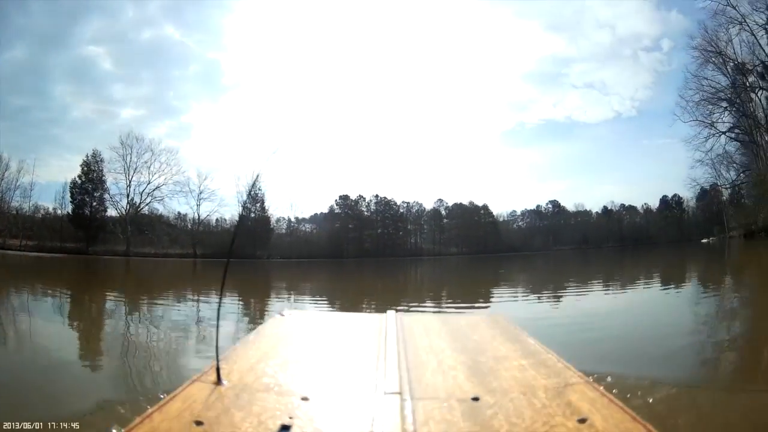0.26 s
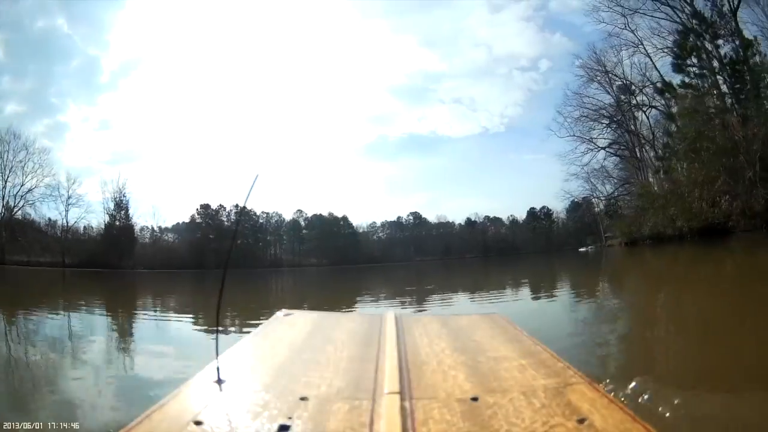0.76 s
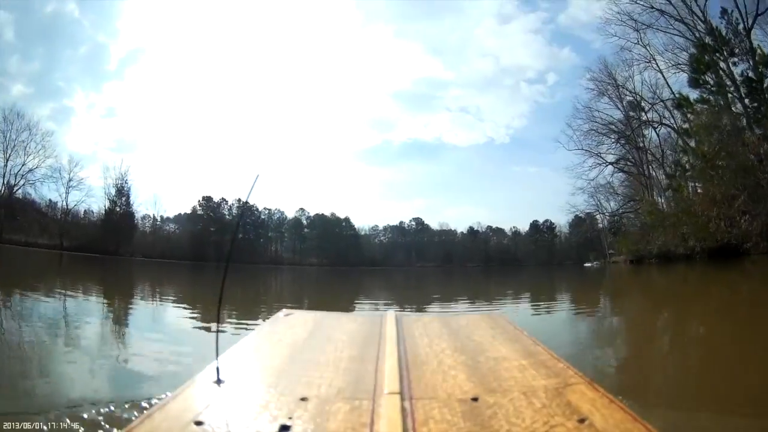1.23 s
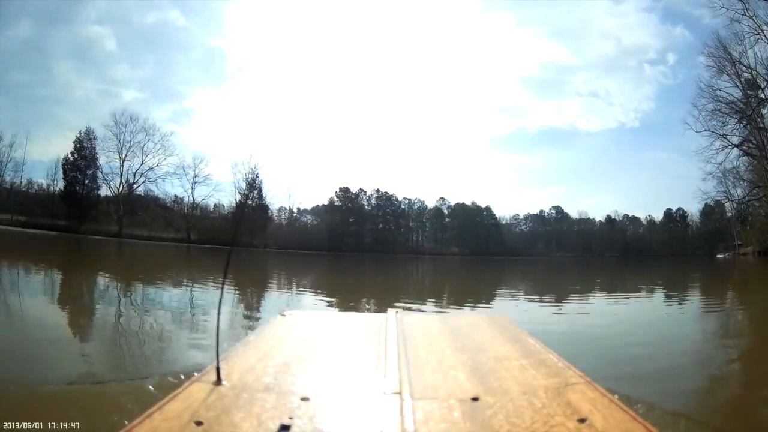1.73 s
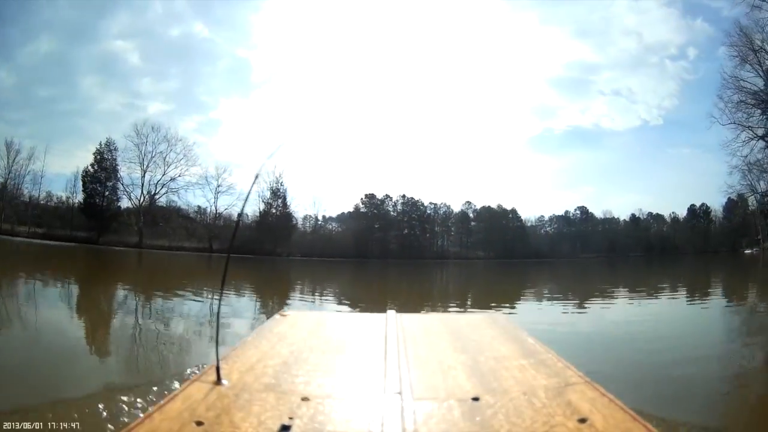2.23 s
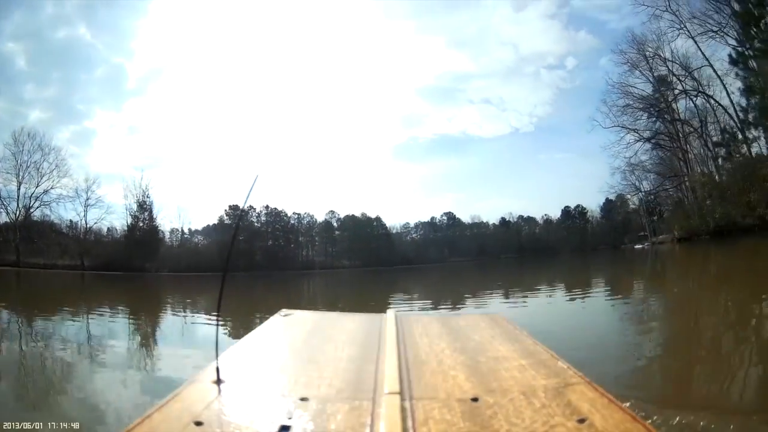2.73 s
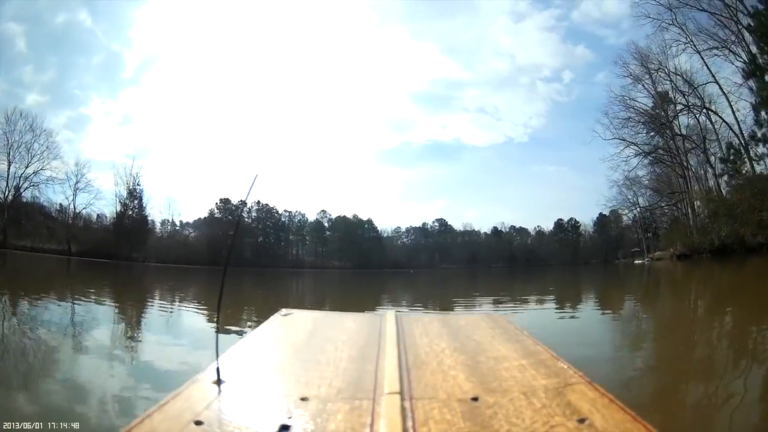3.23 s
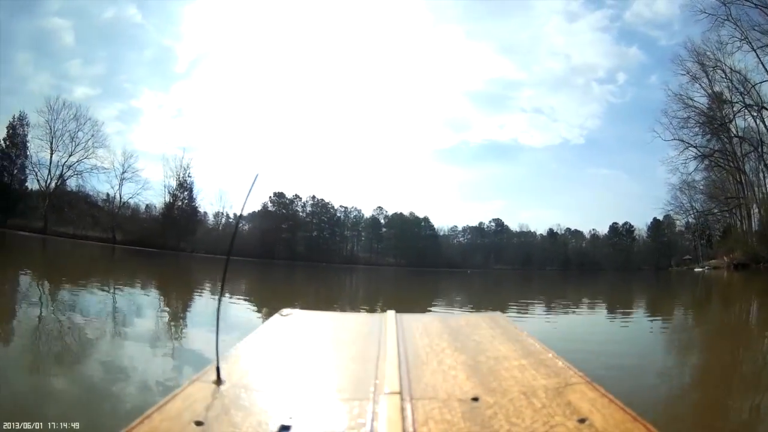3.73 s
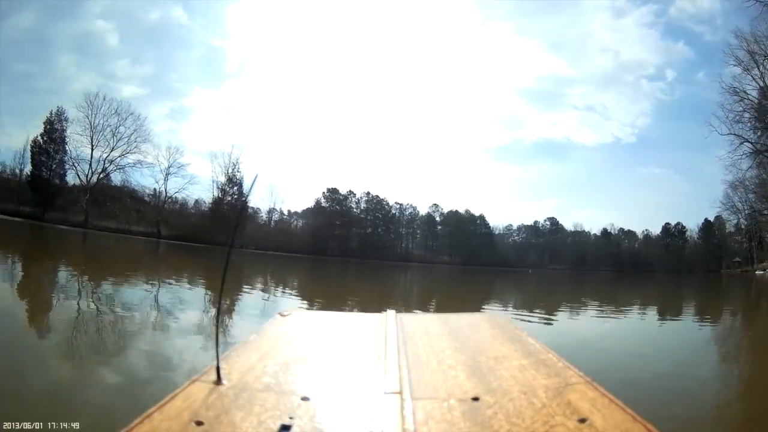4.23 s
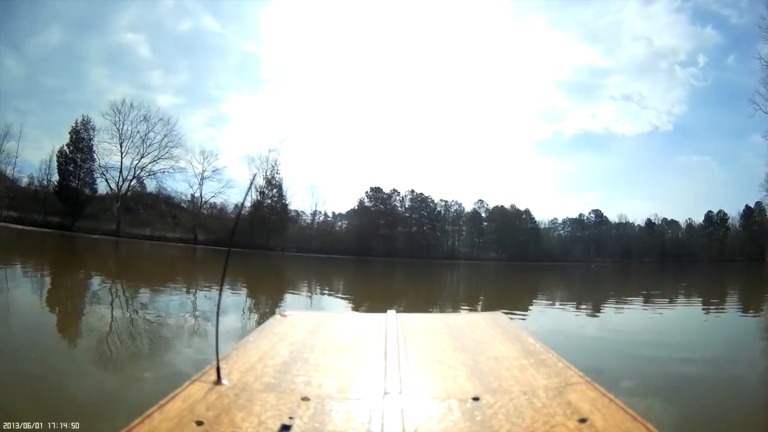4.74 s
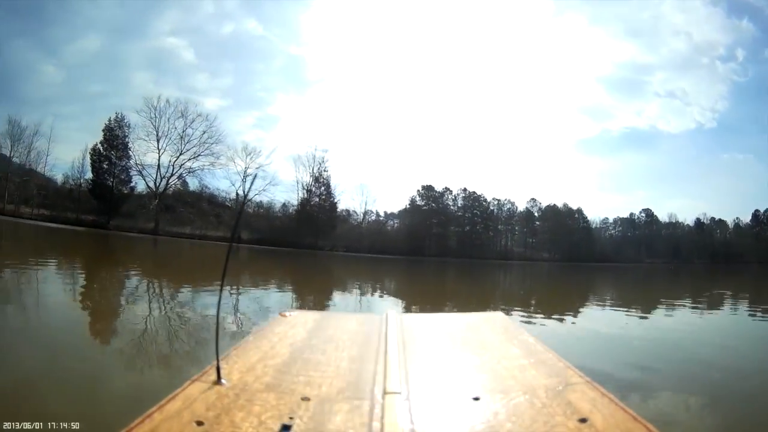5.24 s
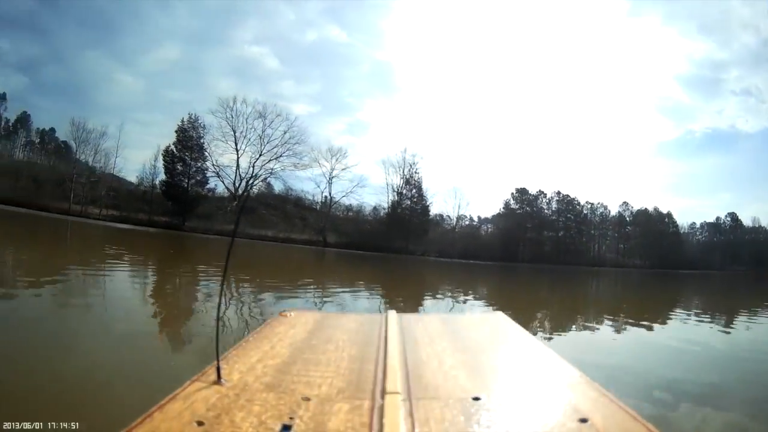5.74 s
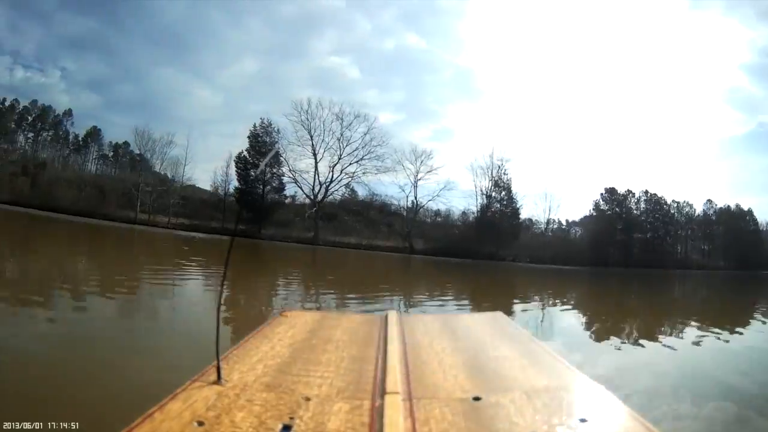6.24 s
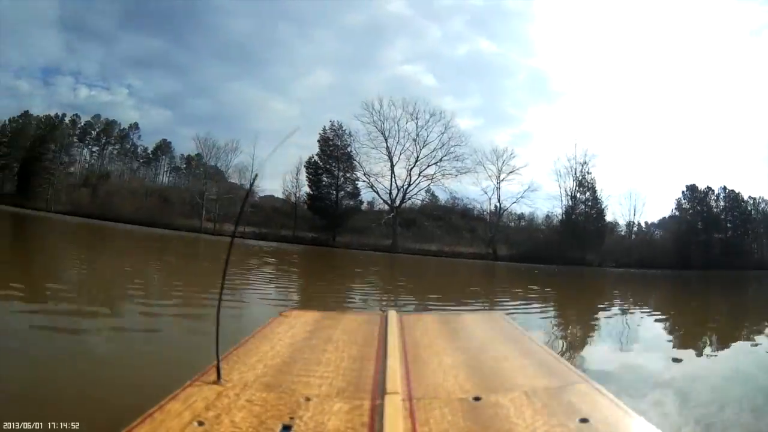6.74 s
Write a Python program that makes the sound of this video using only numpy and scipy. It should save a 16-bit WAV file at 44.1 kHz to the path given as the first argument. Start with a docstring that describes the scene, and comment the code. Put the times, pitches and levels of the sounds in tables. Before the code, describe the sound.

A small electric motor and propeller whine close up on a model boat, surging, dropping out briefly, then climbing in steps to a steady shrill buzz.

```python
"""A model airboat crosses a calm lake, heard from its own deck: blade hum, magnet whine, commutation whistle
and chopper tone of a 14-pole brushless motor with a two-blade propeller, all locked to one shaft speed but the chopper.
The speed climbs for 0.7 s, then the throttle is shut; from 0.85 s the propeller freewheels, electrically silent.
Near 1.1 s the controller restarts softly; the speed steps up until about 4 s and finally eases a little.
Throughout, the tones overload the microphone, which breeds a web of sum and difference tones."""
import sys
import numpy as np
from scipy import signal
from scipy.fft import rfft, irfft, next_fast_len
from scipy.io import wavfile

SR = 44100
rng = np.random.default_rng(int(sys.argv[2]) if len(sys.argv) > 2 else 0)


def to_wav(sig):
    """Store sig (one row per channel, or 1-D mono) as 16-bit WAV at the path in sys.argv[1].

    Samples outside -1..1 are clipped; the rate is SR.
    """
    pcm = np.clip(np.atleast_2d(sig), -1, 1) * 32767
    pcm = np.round(pcm).astype(np.int16)
    wavfile.write(sys.argv[1], SR, pcm.T)  # frames by channels


N = 308259
TIME_S = np.arange(N) / SR

# Stick moves. Each row: start in seconds, shaft speed then headed for in turns per s (Hz).
THROTTLE_MOVES = [(0, 88.61), (0.078, 97.59), (0.331, 108.44), (0.516, 113.24), (0.729, 94.42),
                  (0.813, 58.01), (0.971, 47.45), (1.094, 80.09), (1.321, 86.01), (1.408, 105.72),
                  (1.84, 107.78), (2.43, 112.73), (3.583, 122.32), (3.863, 125.03), (4.056, 134.84),
                  (4.088, 136.37), (5.628, 135.72), (6.393, 133.66)]
# Drive current, cut while the propeller freewheels. Each row: time in seconds, gain of electric sounds (0 to 1).
DRIVE_CURRENT = [(0, 1), (.81, 1), (.846, .55), (.852, 0), (1.086, 0), (1.094, .45), (1.15, 1), (7, 1)]
# Propeller overtones. Each row: multiple of shaft speed.
PROPELLER_ORDERS = [1, 2, 3, 4, 5, 6]
# Their levels. Each row: level in dB re BLADE_DB.
PROPELLER_LEVELS_DB = [-25, 0.5, -22, -13, -29, -24]
# Off-centre rotor's sidebands of the whine. Each row: orders above the whine in multiples of shaft speed, sign.
WOBBLE_ORDERS = [(-2, 1), (-1, 1), (1, -1), (2, 1)]
# Their levels. Each row: level in dB re the whine, extra dB at full whirl.
WOBBLE_LEVELS_DB = [(-23, 9.5), (-2.5, 0), (-34, 28), (-21.5, 13.5)]
# Cogging, present even without current. Each row: multiple of shaft speed.
COGGING_ORDERS = [8, 10, 11, 12, 25, 28, 37, 56, 84]
# Their levels. Each row: level in dB before the hull response.
COGGING_LEVELS_DB = [-66.5, -78.5, -57, -61.5, -71, -59, -60, -59, -54]
# Weaker winding forces. Each row: multiple of chopper frequency, multiple of shaft speed.
FORCE_ORDERS = [(0, 21), (0, 56), (0, 63), (0, 70), (0, 84), (0, 105), (1, 21), (1, 42), (1, -28), (1, -42),
                (1, -63), (1, -126), (2, -63), (2, -105)]
# Their levels. Each row: level in dB at cruise, before the bell response.
FORCE_LEVELS_DB = [-65, -63, -52.5, -61, -43.5, -52, -52, -47, -53, -43.5, -64, -47, -56, -51.5]
# Motor bell response. Each row: frequency in Hz, gain in dB.
BELL_RESPONSE = [(300, -46), (2000, -15.5), (3800, -24), (4600, -9.5), (5200, -1.5), (5800, -11.5),
                 (6600, -18), (8000, -15), (10800, -32.5), (12200, -18), (14000, -19)]
# Pylon and hull response. Each row: frequency in Hz, gain in dB.
HULL_RESPONSE = [(100, -6), (350, -0.5), (650, -17.5), (880, -9), (1035, 3.5), (1200, -9), (1600, -3.5),
                 (1900, 0), (2250, -8), (2700, -9.5), (3500, -27), (5200, -22), (7000, -30), (14000, -44)]
# Spectrum shape of winding-switching hash. Each row: frequency in Hz, relative density in dB.
HASH_SHAPE = [(200, -28), (1500, 11), (3500, 1), (4400, 1), (5200, 12.5), (5900, -3.5), (6700, 2.5),
              (9000, 4), (14000, -3.5)]
# Spectrum shape of water and air along the hull. Each row: frequency in Hz, relative density in dB.
WASH_SHAPE = [(20, 1.5), (50, -2.5), (110, -3.5), (250, -11.5), (600, -16), (1500, -18), (5000, -18),
              (14000, -45)]

INERTIA_S, CRUISE_HZ = .069, 115  # shaft speeds in Hz are turns per s
# Levels at cruise, and the powers of pace with which they grow; whine and commutation precede hull and bell.
BLADE_DB, BLADE_POWER = -44, 1.7
MAGNET_DB, MAGNET_POWER = -44.5, 3.06
COMMUTATION_DB, COMMUTATION_POWER = -31.5, 3.62
# Speeding up draws more current, slowing down less: extra current in dB at this acceleration.
SURGE_DB, SURGE_HZ_PER_S = -39, 100
# The chopper sags as the shaft speeds up; its lower sideband peaks at middle duty.
CHOPPER_HZ, CHOPPER_SAG_HZ_PER_HZ, CHOPPER_DB = 7805, .89, -44
SIDEBAND_DB, MID_DUTY_HZ, DUTY_WIDTH_HZ = -37.5, 107, 39
# Rotor whirl near full throttle; pylon sway from propeller imbalance.
WHIRL_HZ, WHIRL_WIDTH_HZ = 134, 7.7
SWAY_HZ, SWAY_WIDTH_HZ, SWAY_DB = 108, 4.9, -65
RATTLE_DB, BEARING_HISS_DB, BUZZ_DB, HASH_DB, WASH_DB = -57, -66.5, -55, -53, -58.5
OVERLOAD_DB, CUTOFF_HZ = -36, 14200


def from_db(db):
    """Amplitude factor of a dB value."""
    return 10 ** (np.asarray(db) / 20)


def gain_at(response, hz):
    """Gain of a response at any frequency, joined by straight lines in dB over log frequency."""
    points_hz, points_db = np.transpose(response)
    return from_db(np.interp(np.log(np.abs(hz) + 1), np.log(points_hz), points_db))


def coloured(x, response):
    """x through a response; rms about the mean is 1."""
    size = next_fast_len(N)
    spectrum = rfft(x, size) * gain_at(response, np.fft.rfftfreq(size, 1 / SR))
    y = irfft(spectrum, size)[:N]
    return y / y.std()


def drift(rate_hz):
    """Slow chance with spread 1: two-pole low-passed noise, computed every 40 samples."""
    r = np.exp(-80 * np.pi * rate_hz / SR)
    noise = rng.standard_normal(N // 40 + 2002)
    slow = signal.lfilter([1], [1, -2 * r, r * r], noise)[2000:]  # drop the settling
    return np.interp(np.arange(N) / 40, np.arange(len(slow)), slow / slow.std())


def tone(angle_rad, level_db):
    """A sinusoid of the given rms level."""
    return np.sqrt(2) * from_db(level_db) * np.cos(angle_rad)


def every_turn(angle_rad, count=110, size=4096):
    """A random roughness of equal overtones that repeats with each turn of the shaft."""
    overtones = np.exp(2j * np.pi * rng.random(count))
    pattern = irfft(np.r_[0, overtones], size)
    return np.interp(angle_rad, np.arange(size) * 2 * np.pi / size, pattern, period=2 * np.pi)


def near(speed_hz, centre_hz, width_hz):
    """1 at a resonant speed, falling to both sides."""
    return 1 / (1 + ((speed_hz - centre_hz) / width_hz) ** 2)


def shaft_speed():
    """After each stick move the motor eases towards its new speed, without overshoot."""
    speed_hz = np.full(N, float(THROTTLE_MOVES[0][1]))
    for (_, before_hz), (start_s, after_hz) in zip(THROTTLE_MOVES, THROTTLE_MOVES[1:]):
        age = np.maximum(TIME_S - start_s, 0) / INERTIA_S
        speed_hz += (after_hz - before_hz) * (1 - (1 + age) * np.exp(-age))
    return speed_hz


def propeller(angle_rad, speed_hz, pace, flutter_db=0.32):
    """Two blades pass each turn, louder with speed; slight imbalance adds odd multiples and sways the pylon."""
    hum = sum(tone(k * angle_rad, BLADE_DB + db) for k, db in zip(PROPELLER_ORDERS, PROPELLER_LEVELS_DB))
    sway = tone(angle_rad, SWAY_DB) * near(speed_hz, SWAY_HZ, SWAY_WIDTH_HZ)
    return (hum * pace ** BLADE_POWER + sway) * from_db(flutter_db * drift(9))


def magnets(angle_rad, speed_hz, pace, flutter_db=1.18, poles=14):
    """Fourteen poles tug at the stator; whine, wobble and cogging flare up in the hull's resonances."""
    def through_hull(k, db):
        """One multiple of the shaft speed, fluttering, shaped by the hull."""
        force = tone(k * angle_rad, db + flutter_db * drift(10.5))
        return force * gain_at(HULL_RESPONSE, k * speed_hz)

    whirl = near(speed_hz, WHIRL_HZ, WHIRL_WIDTH_HZ)
    whine = through_hull(poles, MAGNET_DB)
    wobble = 0
    for (k, sign), (db, whirl_db) in zip(WOBBLE_ORDERS, WOBBLE_LEVELS_DB):
        wobble += sign * through_hull(poles + k, MAGNET_DB + db + whirl_db * whirl)
    cogging = sum(through_hull(k, db) for k, db in zip(COGGING_ORDERS, COGGING_LEVELS_DB))
    return (whine + wobble) * pace ** MAGNET_POWER + cogging


def windings(angle_rad, speed_hz, pace, surge, flutter_db=3.0, waver_db=0.55):
    """Current steps 42 times a turn and is chopped at a rate that sags with speed; the two mix and ring the bell."""
    chopper_hz = CHOPPER_HZ - CHOPPER_SAG_HZ_PER_HZ * speed_hz
    chop_rad = 2 * np.pi * np.cumsum(chopper_hz) / SR

    def through_bell(m, k, db):
        """One mix of chopper and shaft multiples, shaped by the bell."""
        force = tone(m * chop_rad + k * angle_rad, db)
        return force * gain_at(BELL_RESPONSE, m * chopper_hz + k * speed_hz)

    steady_current = from_db(COMMUTATION_DB) * pace ** COMMUTATION_POWER
    current = np.maximum(steady_current + from_db(SURGE_DB) * surge, 0)
    commutation = current * through_bell(0, 42, waver_db * drift(6))
    duty = np.exp(-((speed_hz - MID_DUTY_HZ) / DUTY_WIDTH_HZ) ** 2)
    sideband = duty * through_bell(1, -21, SIDEBAND_DB + waver_db * drift(6))
    ripple = pace ** -.5  # current is most jagged at low throttle
    weaker = sum(through_bell(m, k, db + flutter_db * drift(8.1))
                 for (m, k), db in zip(FORCE_ORDERS, FORCE_LEVELS_DB))
    return tone(chop_rad, CHOPPER_DB) + commutation + sideband + ripple * weaker


def switching_noise(angle_rad, pace):
    """Uneven switching buzzes and hisses in the bell, growing with the square of the speed."""
    buzz = from_db(BUZZ_DB) * coloured(every_turn(angle_rad), HASH_SHAPE)
    hiss = from_db(HASH_DB) * coloured(rng.standard_normal(N), HASH_SHAPE)
    return (buzz + hiss) * pace ** 2


def bell_ring(level_db=-57):
    """Irregular current kicks keep the bell ringing at any throttle: noise twice through its response."""
    kicks = coloured(rng.standard_normal(N), BELL_RESPONSE)
    return from_db(level_db) * coloured(kicks, BELL_RESPONSE)


def bearings(angle_rad, pace, power=1.0, throb=0.76):
    """Bearings shake pylon and hull: a repeating rattle and a hiss that throbs once a turn."""
    rattle = from_db(RATTLE_DB) * coloured(every_turn(angle_rad), HULL_RESPONSE)
    throbbing = rng.standard_normal(N) * (1 + throb * np.cos(angle_rad))
    hiss = from_db(BEARING_HISS_DB) * coloured(throbbing, HULL_RESPONSE)
    return (rattle + hiss) * pace ** power


def wash(pace, swell_db=2.5, power=1.7):
    """Soft, uneven flow along the hull, stronger at speed."""
    level = from_db(WASH_DB + swell_db * drift(7.9)) * pace ** power
    return level * coloured(rng.standard_normal(N), WASH_SHAPE)


def scene(speed_jitter=0.000184):
    """One shaft drives every motor sound; the electrical ones stop while it freewheels."""
    steady_hz = shaft_speed()
    surge = np.gradient(steady_hz) * SR / SURGE_HZ_PER_S
    speed_hz = steady_hz * (1 + speed_jitter * drift(16.0))
    angle_rad = 2 * np.pi * np.cumsum(speed_hz) / SR
    pace = speed_hz / CRUISE_HZ
    mechanical = propeller(angle_rad, speed_hz, pace) + magnets(angle_rad, speed_hz, pace)
    mechanical += bearings(angle_rad, pace)
    electric = windings(angle_rad, speed_hz, pace, surge)
    electric += switching_noise(angle_rad, pace) + bell_ring()
    drive_s, drive_gain = np.transpose(DRIVE_CURRENT)
    drive = np.interp(TIME_S, drive_s, drive_gain)
    return (drive * electric + mechanical + wash(pace))[None]


def record(dry, hardness=3.9, low_cut_hz=35):
    """The microphone stage flattens the peaks at twice the sample rate; deep bass and top are cut."""
    drive = signal.resample_poly(dry, 2, 1, axis=-1) / from_db(OVERLOAD_DB)
    flat = from_db(OVERLOAD_DB) * drive / (1 + np.abs(drive) ** hardness) ** (1 / hardness)
    flat = signal.resample_poly(flat, 1, 2, axis=-1)
    high_pass = signal.butter(1, low_cut_hz, "high", fs=SR, output="sos")
    low_pass = signal.firwin(255, CUTOFF_HZ, window=("kaiser", 9), fs=SR)
    return signal.fftconvolve(signal.sosfilt(high_pass, flat), low_pass[None], "same")


dry = scene()
out = record(dry)
to_wav(out)
```